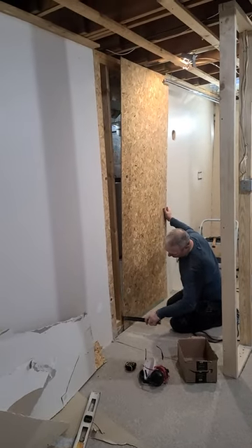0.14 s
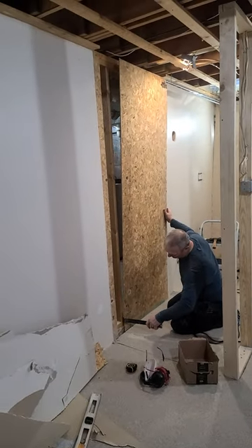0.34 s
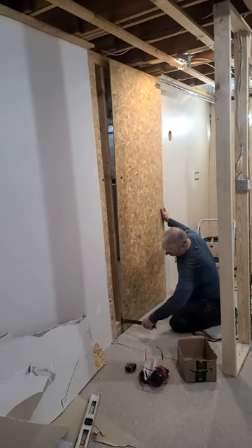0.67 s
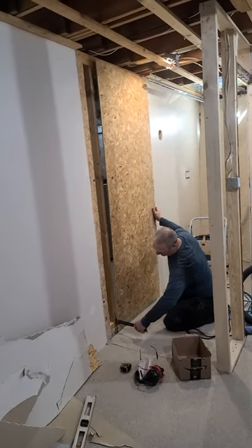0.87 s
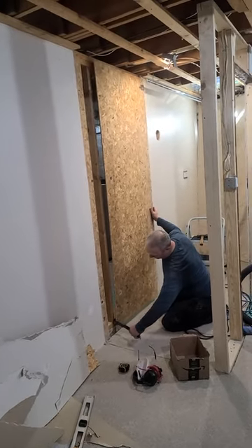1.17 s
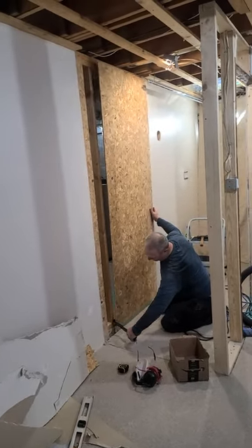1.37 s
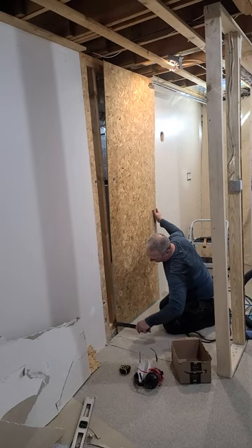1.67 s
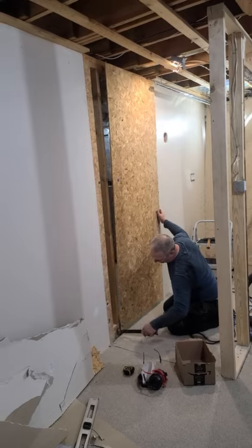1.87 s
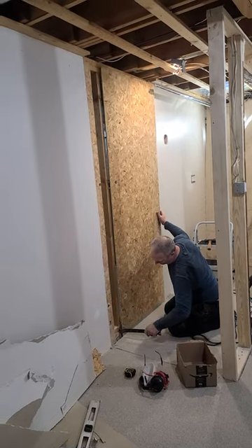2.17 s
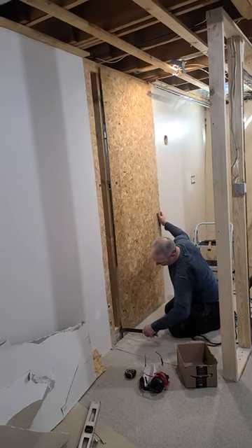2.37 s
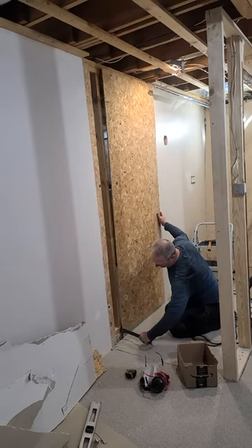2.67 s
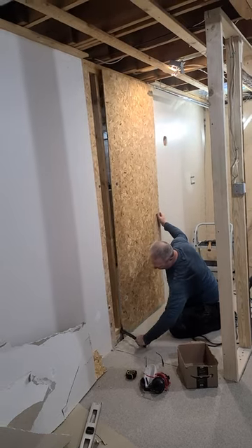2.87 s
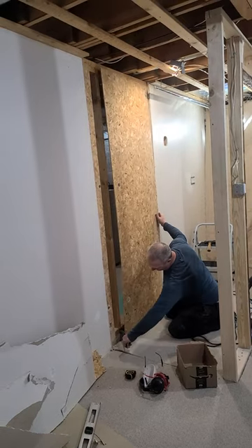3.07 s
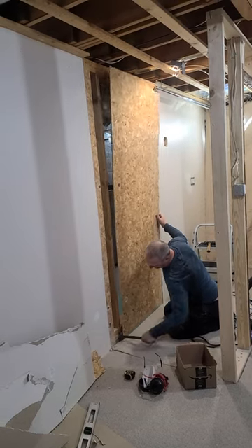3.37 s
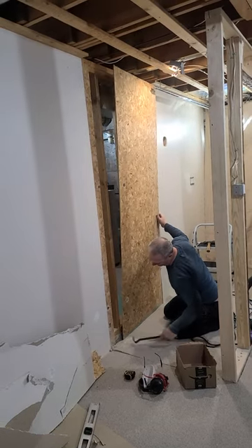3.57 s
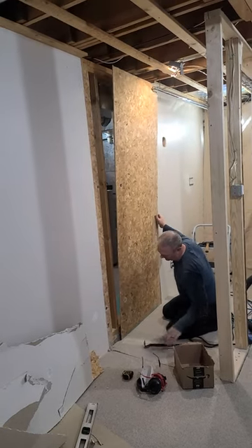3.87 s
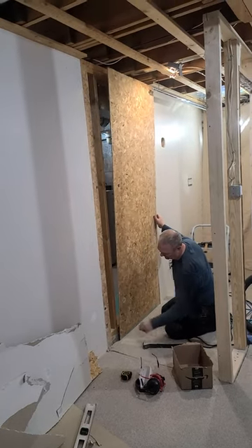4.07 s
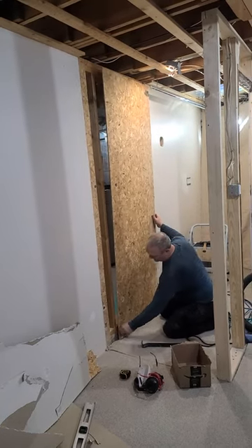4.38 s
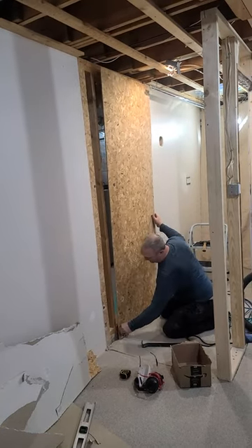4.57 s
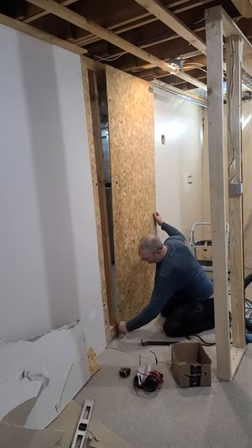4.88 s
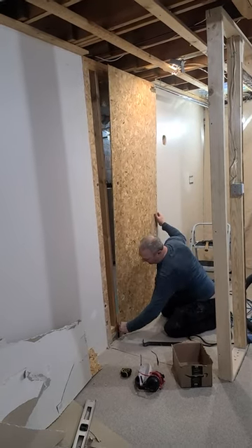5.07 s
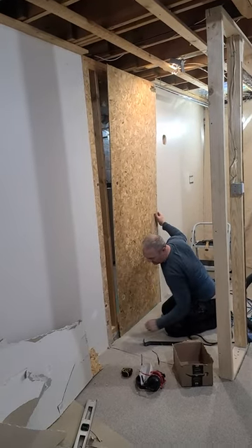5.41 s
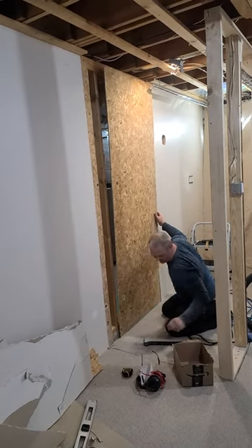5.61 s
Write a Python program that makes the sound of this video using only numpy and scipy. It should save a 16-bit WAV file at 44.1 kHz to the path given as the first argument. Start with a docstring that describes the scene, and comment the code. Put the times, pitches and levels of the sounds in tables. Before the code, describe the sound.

A nail creaks briefly, then wood cracks, scrapes and knocks dully as a chipboard panel is levered off its studs in a basement.

```python
"""A pry bar levers a chipboard wall panel off its studs in a bare basement, a few metres away.
A nail squeaks and creaks as it sticks and slips in the wood, and sets the steel bar ringing.
Fibres snap in sharp clicks, bar and boots scrape over grit, and the loosening panel chafes,
booms as it flexes and knocks on studs and floor. Close walls answer; ventilation murmurs underneath."""
import sys
import numpy as np
from scipy import signal
from scipy.fft import rfft, irfft, next_fast_len
from scipy.io import wavfile
from scipy.ndimage import uniform_filter1d

SR = 44100
rng = np.random.default_rng(int(sys.argv[2]) if len(sys.argv) > 2 else 0)


def wav_out(sig):
    """Save sig, one row per channel (or a flat mono array), as 16-bit PCM at SR to the path in sys.argv[1]."""
    wavfile.write(sys.argv[1], SR, np.round(np.clip(np.atleast_2d(sig).T, -1, 1) * 32767).astype(np.int16))


N = 253398
TIME = np.arange(N) / SR
AGE = np.arange(SR // 3) / SR  # seconds since a hit


def amp(db):
    """Decibels to gain."""
    return 10 ** (np.asarray(db) / 20)


def unit(x):
    """Scaled to rms 1."""
    return x / np.sqrt(np.mean(x ** 2) + 1e-20)


def along(points, hz):
    """Read a (frequency, value) curve on a log frequency axis."""
    freqs, values = np.transpose(points)
    return np.interp(np.log(hz + 1), np.log(freqs + 1), values)


def add(track, s, sound):
    """Mix a sound in at s seconds."""
    part = track[..., max(round(s * SR), 0):][..., :sound.shape[-1]]
    part += sound[..., :part.shape[-1]]


def eq(x, *curves):
    """Minimum-phase EQ from stacked (frequency [Hz], gain [dB]) curves."""
    size = 2 * next_fast_len(x.shape[-1] // 2 + SR // 10, True)
    hz = np.fft.rfftfreq(size, 1 / SR)
    cepstrum = irfft(np.log(amp(sum(along(points, hz) for points in curves))))
    cepstrum[1:size // 2] *= 2
    cepstrum[size // 2 + 1:] = 0
    return irfft(rfft(x, size) * np.exp(rfft(cepstrum)))[..., :x.shape[-1]]


def bell(hz, gain_db):
    """The EQ curve of one broad peak or dip."""
    return [(hz * .78, 0), (hz, gain_db), (hz * 1.25, 0)]


def noise(spectrum):
    """Coloured mid and side noise of rms 1."""
    return unit(eq(rng.standard_normal((2, N)), spectrum))


def ring(modes):
    """Damped modes, struck at slightly new strengths each time."""
    hz, db, t60 = np.transpose(modes)
    strength = amp(db + rng.standard_normal(len(hz))) * rng.choice([-1, 1], len(hz))
    decay = np.exp(-np.log(1000) * AGE / t60[:, None])
    return strength @ (decay * np.sin(2 * np.pi * hz[:, None] * AGE))


def stroke(s, rise, fall, roundness):
    """A swell of force that peaks at time s, 20 dB down one rise earlier and one fall later."""
    away = np.maximum((s - TIME) / rise, (TIME - s) / fall)
    return amp(-20 * np.abs(away) ** roundness)


# the short decay of the bare walls: (frequency [Hz], t60 [s])
WALL_DECAY = [(100, 0.35), (400, 0.26), (1400, 0.2), (4000, 0.17), (9000, 0.15), (15000, 0.12)]
def basement(direct_db, early_db, early_t60):
    """Mid and side room response: the direct click, a close scatter of echoes, then the walls' tail."""
    hz, t, spectrum = signal.stft(rng.standard_normal((2, len(AGE))), SR, nperseg=256)
    decay = amp(-60 * t / along(WALL_DECAY, hz)[:, None])
    tail = signal.istft(spectrum * decay, SR, nperseg=256)[1][:, :len(AGE)]
    echoes = unit(rng.standard_normal(tail.shape) * rng.standard_normal(tail.shape) ** 2)
    response = tail + echoes * amp(early_db - 60 * AGE / early_t60)
    response[0, 0] += amp(direct_db)
    return response


def distant(x, direct_db):
    """A continuous source heard across the room, its power kept in the mid channel."""
    response = basement(direct_db, early_db=7, early_t60=0.052)
    return signal.fftconvolve(x[None], response / np.linalg.norm(response[0]), axes=1)[:, :N]


# the colour of the nail's friction: (frequency [Hz], gain [dB])
NAIL_EQ = [(300, -20), (800, -4), (1500, 1), (2500, 3), (3600, -1.5), (5000, -11), (9000, -17),
           (16000, -37)]
# the squeak's harmonics, from the fundamental up: (level [dB])
SQUEAK_HARMONICS = [0, -9, -15, -22]
# the nail catches in the stud: (time [s], pitch [Hz], level [dB])
CATCHES = [(0, 1900, -44), (.05, 1850, -42.5)]
SAG_SHARE, SAG_S, FADE_DB_PER_S = .24, .024, 90  # each squeak sinks and fades as the nail eases
LET_GO_S, COLLAPSE_S, RELEASE_S = .086, 0.0166, 0.019  # the nail lets go: pitch and level fall away
def nail_squeak():
    """Fast regular slips sing and sag after each catch, and the panel groans along."""
    latest = np.searchsorted([row[0] for row in CATCHES[1:]], TIME)
    start, hz, db = np.array(CATCHES)[latest].T
    age, loose = np.maximum(TIME - start, 0), np.maximum(TIME - LET_GO_S, 0)
    pitch = hz * (1 - SAG_SHARE * (1 - np.exp(-age / SAG_S))) * np.exp(-loose / COLLAPSE_S)
    level = amp(db - FADE_DB_PER_S * age - 20 * (loose / RELEASE_S) ** 2)
    jitter = 1 + .06 * rng.standard_normal(N)
    phase = 2 * np.pi * np.cumsum(pitch * jitter) / SR
    tone = sum(amp(gain_db) * np.sin(k * phase) for k, gain_db in enumerate(SQUEAK_HARMONICS, 1))
    grip = 1 + 0.08 * unit(uniform_filter1d(rng.standard_normal(N), size=16))
    rasp = amp(-17) * unit(eq(rng.standard_normal(N), NAIL_EQ) * (1 + np.sin(phase)))
    limp = 1 + 0.4 * np.sin(phase / 2)  # every other slip is weaker
    squeak = level * (tone * grip * limp + rasp)
    both = squeak + panel_groan()
    return amp(-5) * np.array([both, amp(0.5) * squeak]) + amp(-8.5) * distant(both, direct_db=0)


def panel_groan(hz=337.7, start_s=0.0091, attack_s=0.0017, length_s=0.07):
    """The panel sounds a short low note and its octave under the squeak."""
    age = np.maximum(TIME - start_s, 0)
    phase = 2 * np.pi * hz * age
    swell = (1 - np.exp(-age / attack_s)) * np.exp(-2 * (age / length_s) ** 2)
    return amp(-38.5) * swell * (np.sin(phase) + amp(-19) * np.sin(2 * phase))


# the bright crunch of grit: (frequency [Hz], gain [dB])
GRIT_EQ = [(400, -3), (1000, -2), (2000, -0.5), (3300, 2), (5500, 1.5), (8500, 1), (10500, -4), (14000, -4),
           (16000, 6)]
def grit(per_s, spread_db):
    """Tiny breaks of random size at random moments."""
    breaks = (rng.random(N) < per_s / SR) * rng.standard_normal(N)
    return eq(breaks * amp(spread_db * rng.standard_normal(N)), GRIT_EQ)


# bar and boots over wood and grit: (peak time [s], rise [s], fall [s], level [dB], resonance [Hz])
SCRAPES = [(.02, 0.12, 0.074, -53, 12400), (0.251, .014, 0.018, -45, 7600), (1.34, .11, 0.16, -54, 4960),
           (1.67, .14, 0.1, -43.5, 4200), (1.94, 0.3, 0.14, -66, 5050), (2.169, 0.032, 0.059, -43.5, 5900),
           (2.235, 0.045, 0.026, -47.5, 4900), (2.4, 0.011, .013, -48, 4100),
           (3.215, 0.16, 0.34, -62.5, 8500), (3.345, 0.2, 0.19, -59, 5400),
           (3.416, 0.026, 0.025, -36, 7250), (3.501, .07, 0.044, -51.5, 8800),
           (3.621, 0.085, 0.068, -46, 5930), (3.705, 0.05, 0.068, -49.5, 8400),
           (3.881, 0.026, 0.045, -61.5, 5850), (4.029, 0.051, 0.067, -62.5, 6000),
           (4.764, 0.045, 0.066, -68.5, 5900), (4.857, 0.18, 0.32, -69.5, 5860),
           (5.214, 0.061, 0.081, -58, 5130), (5.3, 0.05, 0.078, -68.5, 5400),
           (5.408, 0.014, 0.1, -55, 5640)]
def scrapes():
    """Rubbing breaks off grit and a few larger chips; each stroke swells with its own resonance."""
    fine = grit(per_s=1300, spread_db=2)
    rub, effort = np.zeros(N), np.zeros(N)
    for s, rise, fall, db, hz in SCRAPES:
        force = stroke(s, rise, fall, roundness=0.89)
        active = force > .003
        rub[active] += amp(db) * force[active] * unit(eq(fine[active], bell(hz, gain_db=4.5)))
        effort += amp(db) * force
    chips = unit(grit(per_s=31, spread_db=5)) * np.minimum(effort, amp(-64))
    return distant(rub, direct_db=24.5) + amp(-3) * distant(chips, direct_db=24)


# the low weight of the moving panel: (frequency [Hz], gain [dB])
RUMBLE_EQ = [(15, 0), (30, -1.5), (45, -7), (62, 1), (82, -0.5), (120, -14), (220, -16), (500, -57.5)]
# the dull rub of board on stud: (frequency [Hz], gain [dB])
RUB_EQ = [(90, -38), (200, -4.5), (350, 4), (560, -9), (750, -8), (1150, -16.5), (1600, -17.5), (2200, -26),
          (3000, -19), (8000, -38)]
# heaves on the panel: (peak time [s], rise [s], fall [s], rumble [dB], rub [dB], resonance [Hz])
HEAVES = [(.2, 0.88, 0.88, -57.5, -57.5, 705), (1.75, 0.68, 0.76, -75, -61.5, 435),
          (2.8, 0.46, 0.74, -65, -66, 340), (3.37, 0.24, 0.2, -79, -58, 760),
          (3.52, 0.23, 0.65, -48.5, -61, 270), (4.17, .25, 0.74, -61.5, -61, 1600),
          (5.202, 0.12, 0.062, -70, -60, 310), (5.6, 1, 0.7, -60, -68.5, 263)]
def panel_heaves():
    """With each heave the panel rumbles and chafes softly against the studs, then settles."""
    rumble, rub, track = noise(RUMBLE_EQ), noise(RUB_EQ), np.zeros((2, N))
    for s, rise, fall, rumble_db, rub_db, hz in HEAVES:
        force = stroke(s, rise, fall, roundness=1.55)
        active = force > .01
        chafe = unit(eq(rub[:, active], bell(hz, gain_db=4.5)))
        track[:, active] += force[active] * (amp(rumble_db) * rumble[:, active] + amp(rub_db) * chafe)
    return track


# the room tone: (frequency [Hz], gain [dB])
AIR_EQ = [(15, -22), (30, 0.5), (60, -1), (130, -17), (250, -19.5), (370, -12), (560, -23), (1400, -22),
          (2600, -30.5), (4800, -32), (7900, -46), (11800, -35.5), (16000, -64)]
def ventilation():
    """A steady bed of moving air: a low murmur with a faint hiss."""
    return amp(-67) * noise(AIR_EQ)


# the steel bar's ring against the nail: (frequency [Hz], level [dB], t60 [s])
BAR_MODES = [(721.5, 3, 0.17), (842, -3, 0.13), (1225.4, 4.5, 0.34), (1464, -7, 0.29), (1970, -8.5, 0.27),
             (2520, -2, 0.15), (3210, 2, 0.11), (5600, -26, 0.85), (6400, -36, 0.31)]
# pulls that drag the nail out: (peak time [s], rise [s], fall [s], level [dB], bar ring send [0-1])
PULLS = [(.16, .02, .034, -34.5, 0.6), (.296, .048, .034, -38.5, 0.28)]
SLIPS_PER_S, SLIPS_GAINED_PER_S = 260, 240  # at a light pull, and added at full force
def nail_creak():
    """The nail slips unevenly, faster and louder the harder it is pulled, and sets the bar ringing."""
    _, _, _, db, send = np.transpose(PULLS)
    force = np.array([stroke(s, rise, fall, roundness=1.8) for s, rise, fall, _, _ in PULLS])
    rate = SLIPS_PER_S + SLIPS_GAINED_PER_S * force.sum(axis=0)
    count = np.floor(np.cumsum(rate * (1 + 2.2 * rng.standard_normal(N))) / SR)
    slips = np.diff(np.maximum.accumulate(count), prepend=0) * np.sqrt(SR / rate)  # one click a slip
    slips *= amp(0.98 * rng.standard_normal(N))
    snap, steel = eq(signal.unit_impulse(len(AGE)), NAIL_EQ), ring(BAR_MODES)
    rasp = signal.fftconvolve(slips * (amp(db) @ force), snap / np.linalg.norm(snap))[:N]
    clang = signal.fftconvolve(slips * ((amp(db) * send) @ force), steel / np.linalg.norm(steel))[:N]
    return amp(-2) * distant(rasp, direct_db=25.5) + amp(-1.5) * distant(clang, direct_db=30)


# the bite of splintering chipboard: (frequency [Hz], gain [dB])
SPLINTER_EQ = [(60, -1.5), (350, 4.5), (600, 2.5), (1200, 7.5), (2200, -1.5), (3300, 3.5), (5500, 2.5),
               (8500, 0.5), (10500, -8), (14000, -7.5), (16000, -11)]
# fibres snapping and the bar ticking on nails:
# (time [s], level [dB], body [dB], edge [dB], ring pitch [Hz], ring level [dB])
CRACKS = [(.146, -32.5, -15, 5.5, 3590, 3.5), (.828, -59.5, -26, 14, 4850, -4),
          (0.874, -57, -32, 14, 8200, -17), (1.017, -41, -5, 11, 3170, 0), (1.0611, -46, -40, 12, 3450, 1),
          (1.135, -47, -11, 6, 8000, -4), (1.32, -46, -24, 4, 5600, -8), (1.45, -40.5, -27, -3, 3340, -7),
          (1.5663, -37.5, -41, 10.5, 3560, -31), (1.6275, -36.5, -30, 9, 5160, -5),
          (1.6545, -27.5, -29, -10, 4190, -1), (1.6643, -25, -12, 5, 2860, -8.5),
          (1.6904, -22.5, -14, 4, 3380, -20), (1.7066, -22, -13, 8.5, 2870, -24),
          (1.856, -39.5, -23, 2, 4990, -3.5), (2.008, -50.5, -1, -8, 2320, 4),
          (2.1314, -42, -11, 4, 4120, -1), (2.155, -33.5, -15.5, 6, 5690, -23),
          (2.2003, -41, -7, 8, 1006, -8), (2.2161, -32, -13.5, -8, 5000, -0.5),
          (2.402, -27, -18.5, -3, 3860, -6.5), (2.413, -32.5, -9.5, -10, 6260, -23),
          (2.603, -47.5, -0.5, 0, 4230, 2), (2.616, -37.5, -9, -1, 4730, -11),
          (2.6317, -31, 1, 4.5, 4750, -0.5), (2.641, -39.5, -2, 4, 1064, 7),
          (2.8226, -34, -20.5, -0.5, 2860, -9), (2.974, -54.5, -15, 8, 6100, 2.5),
          (3.12, -49, -7, 15, 8300, -10), (3.3748, -41, -5, 8, 6200, -15),
          (3.4174, -31, -10.5, 11, 8700, -4), (3.4239, -36, -1.5, 2, 5430, 3.5),
          (3.4643, -35.5, -9.5, 8, 7300, -21), (3.604, -31.5, -19, 11, 5790, 3.5),
          (3.6093, -34, -8.5, -2, 6070, 2), (3.6597, -37, -45, 2, 5730, -15),
          (3.7556, -38, -7.5, 6.5, 5640, -9), (4.1007, -32, -2, 2.5, 6600, -20),
          (4.812, -49.5, -27, 4, 5400, -2), (5.368, -51.5, -25, 14, 6230, -0.5)]
def fibre_cracks():
    """Each snap is a click coloured by the piece that breaks, which rings briefly as the room answers."""
    track = np.zeros((2, N))
    for s, db, body_db, edge_db, hz, ring_db in CRACKS:
        tone = [(1400, body_db + 5.5), (3000, 0), (8000, 0), (12000, edge_db)]
        # thin pieces at the edge click straight at the listener; thick ones sound through the wall
        room = basement(direct_db=14 - 0.39 * body_db, early_db=-15.5, early_t60=0.1)
        click = eq(room, SPLINTER_EQ, tone, bell(hz, gain_db=3.5))
        close_modes = [(hz * np.exp(.06 * detune), 0, .14) for detune in rng.standard_normal(4)]
        piece = np.array([ring(close_modes), ring(close_modes)])
        add(track, s, amp(db - 12) * (click + amp(ring_db - 6) * piece))
    return track


# hard jerks of the nail: (time [s], level [dB])
JERKS = [(.158, -44), (.166, -43.5), (.272, -55)]
def bar_clinks():
    """Each hard jerk of the nail strikes the bar, and the steel rings on."""
    track = np.zeros((2, N))
    for s, db in JERKS:
        add(track, s, amp(db) * np.array([ring(BAR_MODES), amp(-2) * ring(BAR_MODES)]))
    return track


# the whole sheet's deep bending modes: (frequency [Hz], level [dB], t60 [s])
SHEET_MODES = [(29.6, -5, 0.64), (47.3, -10, 1), (59.1, -3, 0.6), (76.4, 1, 0.24), (109, -8, 0.17),
               (149, -11, 0.16), (198.4, -5, 0.19)]
# flexes of the sheet: (time [s], level [dB])
BOOMS = [(0.488, -64), (0.536, -51), (2.751, -49.5), (3.479, -33), (3.529, -43.5), (3.64, -39),
         (3.906, -56), (4.115, -41), (5.405, -38), (5.449, -37.5), (5.512, -42)]
def sheet_booms(attack_s=0.0018):
    """The loose sheet flaps in its lowest bending modes, in the mid channel only."""
    track = np.zeros((2, N))
    for s, db in BOOMS:
        add(track[0], s, amp(db) * ring(SHEET_MODES) * (1 - np.exp(-AGE / attack_s)))
    return track


# the boxy colour of struck chipboard: (frequency [Hz], gain [dB])
BOARD_EQ = [(40, -13), (130, -14.5), (210, 0), (330, 5.5), (560, -5), (1000, 5.5), (1700, 3.5), (2300, -4),
            (5000, -11.5), (8500, -21), (10000, -26), (16000, -24)]
# the panel's woody ring: (frequency [Hz], level [dB], t60 [s])
PANEL_MODES = [(190, -23, 0.27), (226, -3.5, 0.13), (297, 0, 0.12), (352, 2.5, 0.39), (389.5, -3, 0.16),
               (460, -41, 0.42), (666, -3.5, 0.34), (1004, -1.5, 0.3), (1217, -3.5, 0.31), (1488, 3.5, 0.2),
               (1707, -2, 0.14), (2280, -12, 0.2)]
# hits on studs and floor: (time [s], level [dB], clack [dB], spot pitch [Hz], contact time [s])
KNOCKS = [(2.639, -34, -2, 424, 0.003), (2.6597, -25, -11, 336.4, 0.00059), (4.099, -35, -4, 656, 0.00029),
          (4.118, -28, -14, 343.6, 0.0014), (4.205, -33, -32, 228, 0.00071),
          (4.218, -40.5, -26, 289, 0.0011), (4.292, -48.5, -22, 384, 0.003), (4.35, -53, -12, 290, 0.0038),
          (5.404, -41.5, -6, 193, 0.0034), (5.508, -46.5, -3, 185, 0.001)]
def panel_knocks():
    """Blows ring the panel's modes and the note of the struck spot; soft contacts build slowly."""
    track = np.zeros((2, N))
    for s, db, clack_db, hz, contact_s in KNOCKS:
        wood = eq(basement(direct_db=12, early_db=-8, early_t60=0.086), BOARD_EQ)
        wood += amp(-19) * np.array([ring(PANEL_MODES), ring(PANEL_MODES)])
        edge_db = 5 + 1.4 * clack_db  # a duller blow loses its top faster than its clack
        tone = [(450, 0), (900, clack_db), (1800, clack_db), (4000, edge_db)]
        wood = eq(wood, tone, bell(hz, gain_db=-1.5))
        wood[0] += amp(-10.5) * ring([(hz, 0, .17)])  # the struck spot
        add(track, s, amp(db + 6) * wood * (1 - np.exp(-AGE / contact_s)))
    return track


# stereo width, narrow in the bass: (frequency [Hz], side gain [dB])
WIDTH_EQ = [(50, -11), (150, -12), (350, -13), (700, -3.5), (1500, 0), (12000, -0.5)]
# the balance, added on the left and taken off the right: (frequency [Hz], gain [dB])
BALANCE_EQ = [(100, 0.23), (300, -0.43), (1000, -0.55), (2500, -0.8), (12000, -1.2)]
def microphone_ports(pair):
    """Mid and side to left and right; the right port is nearer, so the left hears 6 samples later."""
    mid, side = pair[0], eq(pair[1], WIDTH_EQ)
    left = np.pad(mid + side, (6, 0))[:N]
    right = mid - side
    return np.array([eq(left, BALANCE_EQ), eq(right, [(hz, -db) for hz, db in BALANCE_EQ])])


def scene():
    """The work on the panel over the ventilation, in stereo."""
    prying = nail_squeak() + nail_creak() + bar_clinks() + fibre_cracks()
    handling = panel_knocks() + sheet_booms() + scrapes() + panel_heaves()
    return microphone_ports(prying + handling + ventilation())


# the microphone's top-end roll-off: (frequency [Hz], gain [dB])
MICROPHONE_EQ = [(14500, -1), (15700, -16), (16400, -32)]
TOP_HZ = 16400
def record(dry):
    """The microphone rolls off the highest treble and keeps nothing above its band limit."""
    size = next_fast_len(N + SR // 2)
    in_band = np.fft.rfftfreq(size, 1 / SR) < TOP_HZ
    return irfft(rfft(eq(dry, MICROPHONE_EQ), size) * in_band, size)[:, :N]


dry = scene()
out = record(dry)
wav_out(out)
```